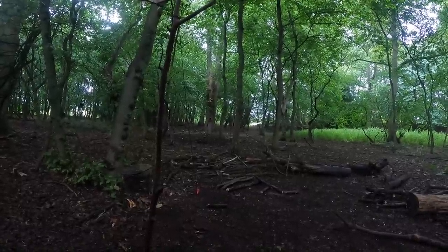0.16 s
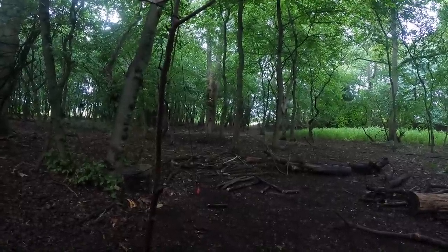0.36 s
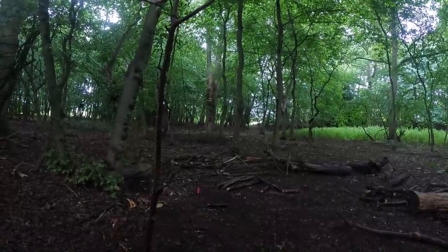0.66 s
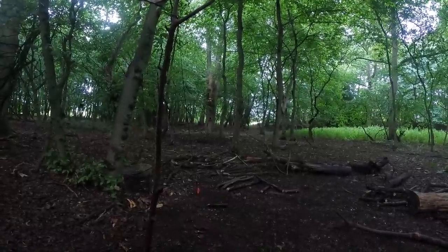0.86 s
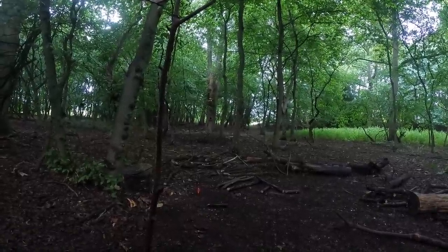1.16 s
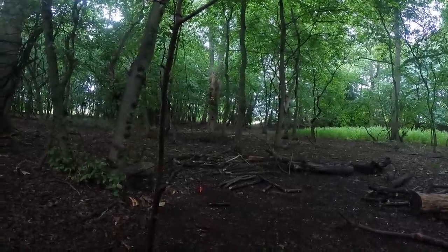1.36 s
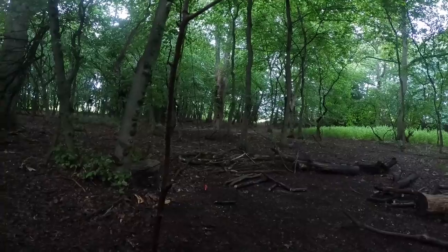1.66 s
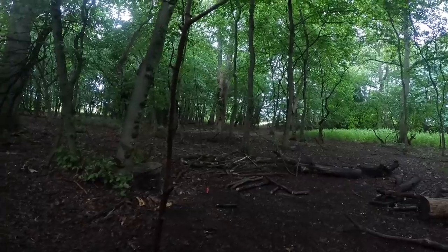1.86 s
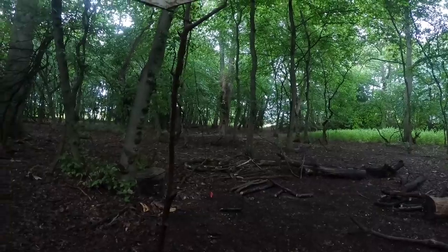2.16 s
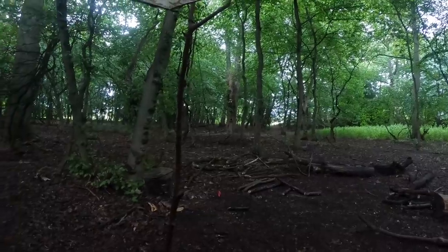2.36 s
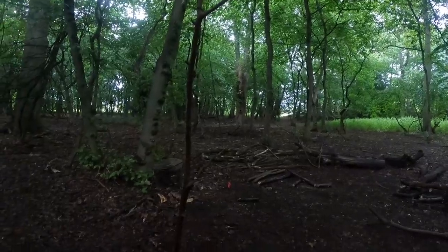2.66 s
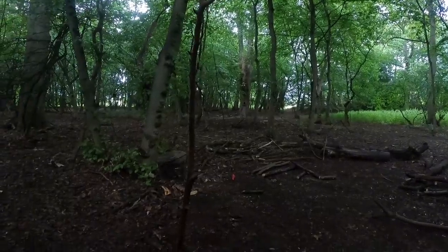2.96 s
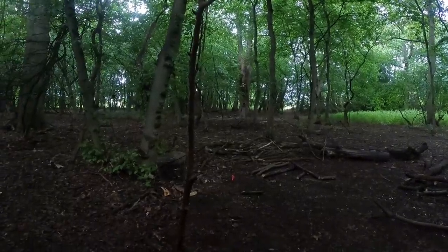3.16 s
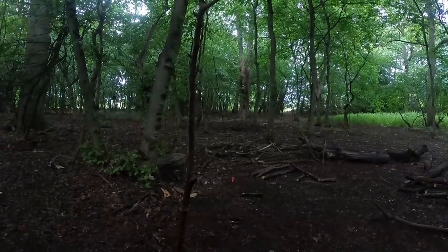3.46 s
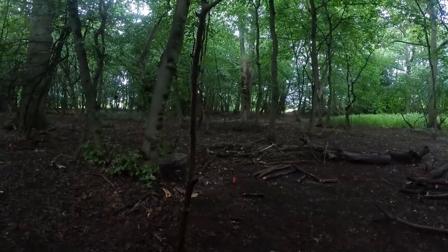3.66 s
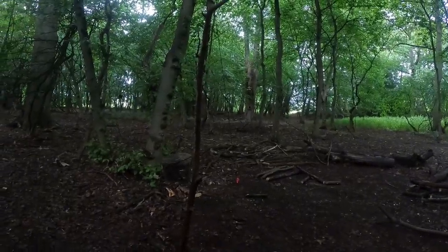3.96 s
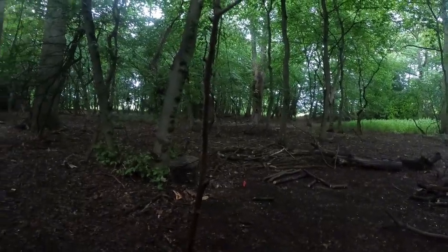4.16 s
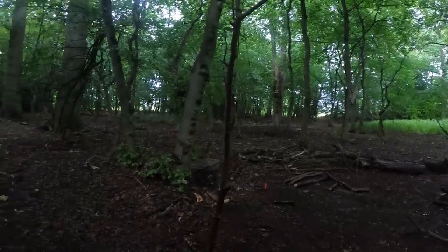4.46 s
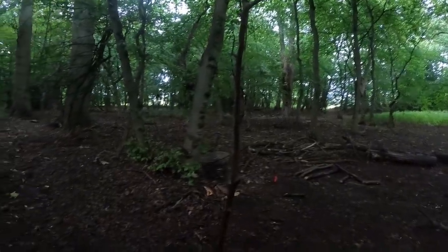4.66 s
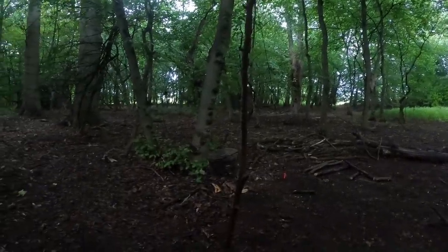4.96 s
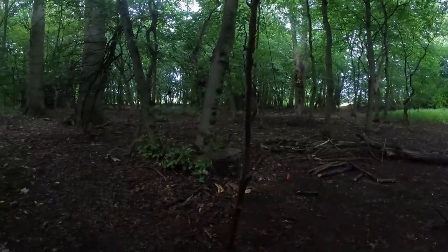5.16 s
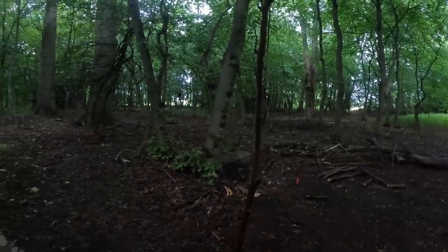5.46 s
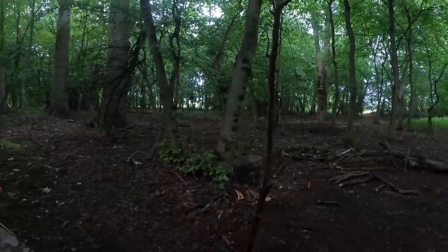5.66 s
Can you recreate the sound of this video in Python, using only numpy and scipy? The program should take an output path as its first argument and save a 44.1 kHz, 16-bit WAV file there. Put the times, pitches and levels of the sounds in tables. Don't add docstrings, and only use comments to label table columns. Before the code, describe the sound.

Heavy raindrops smack taut tent fabric close overhead while a small bird chips, whistles and trills over soft distant rain in the woods.

```python
import sys
import numpy as np
from scipy import signal
from scipy.fft import rfft, irfft
from scipy.io import wavfile
from scipy.ndimage import uniform_filter1d

SR = 44100
rng = np.random.default_rng(int(sys.argv[2]) if len(sys.argv) > 2 else 0)


def field_ratio(decibels):
    return 10 ** (np.asarray(decibels, dtype=float) / 20)


def store_wav(level_fs):
    pcm = np.round(np.clip(np.atleast_2d(level_fs), -1, 1) * 32767)
    wavfile.write(sys.argv[1], SR, pcm.T.astype(np.int16))


N = 257103

# f/Hz, level per Hz/dB
SPRAY = [(300, 2), (1000, 4), (3500, 0.5), (7000, -4.5), (12000, -20.5), (16000, -25)]


def rms_one(x):
    return x / np.sqrt(np.mean(x ** 2) + 1e-20)


def coloured(spectrum, size):
    hz = np.maximum(np.arange(size // 2 + 1) * SR / size, 1)
    points = np.array(spectrum)
    gain = field_ratio(np.interp(np.log(hz), np.log(points[:, 0]), points[:, 1], left=-80, right=-80))
    return rms_one(irfft(rfft(rng.standard_normal(size)) * gain, size))


def curve(rows):
    s, db = np.transpose(rows)
    return field_ratio(np.interp(np.arange(N) / SR, s, db, left=-150, right=-150))


def resonate(x, hz, width_hz):
    r = np.exp(-np.pi * width_hz / SR)
    zeros = np.array([1, 0, -1]) * (1 - r * r) / 2
    poles = [1, -2 * r * np.cos(2 * np.pi * hz / SR), r * r]
    return signal.lfilter(zeros, poles, x)


def add(track, s, sound):
    i = round(s * SR)
    track[i:i + len(sound)] += sound[:N - i]


def heavy_drops():
    # t/s, peak level/dB, last wave f/Hz, flutter f/Hz, slackness/dB (more wave, less flutter)
    overhead = [
        (.2559, -5.5, 130, 3620, -2.5),
        (.8715, -7.5, 150, 3470, 2.5),
        (1.563, -6, 153, 1910, 0),
        (2.5535, -3, 260, 1200, 2.5),
        (2.9918, -9.5, 150, 4070, -5),
        (3.3944, -6.5, 151, 2320, -2.5),
    ]
    out, t = np.zeros(N), np.arange(4096) / SR
    late = np.maximum(t - .0006, 0)
    after = late > 0
    for s, db, wave_hz, flutter_hz, slack_db in overhead:
        wave_db, flutter_db = -8.5 + slack_db, -11 - slack_db
        spike = 1.47 * np.exp(-((t - .0005) / .000045) ** 2)
        spike = spike - 0.25 * np.exp(-((t - .00068) / .0001) ** 2)
        pitch = wave_hz + 750 * np.exp(-late / .0013)
        ringing = np.exp(-late / .0025) + .17 * np.exp(-late / .0075)
        wave = -np.sin(2 * np.pi * np.cumsum(pitch * after) / SR) * ringing
        burst = np.exp(-(late / .0015) ** 2) + .2 * np.exp(-late / .007) + .01 * np.exp(-late / .05)
        burst = after * burst + .15 * np.exp(-((late - .006) / .0015) ** 2)
        flutter = burst * rms_one(resonate(rng.standard_normal(4096), flutter_hz, 530))
        spray = burst * coloured(SPRAY, size=4096)
        dull = signal.lfilter([.45], [1, -.55], spray)
        spray = 1.5 * np.exp(-late / .0005) * spray + dull
        drop = spike + field_ratio(wave_db) * wave + field_ratio(flutter_db) * flutter + field_ratio(-16.5) * spray
        add(out, s, field_ratio(db - 5.0) * drop)
    return out


def light_drops():
    # t/s, peak level/dB, tap f/Hz, spray over the tap level/dB
    near_taps = [(0.117, -49.5, 1080, -0.5), (1.004, -44.5, 696, -2.5), (1.0865, -28, 990, -6.5),
                 (1.248, -34, 1220, -3.5), (1.411, -44.5, 1000, 2.5), (1.991, -61, 1610, 13),
                 (2.316, -49, 1730, 0.5), (2.679, -57.5, 676, 3.5), (2.893, -41.5, 840, -5),
                 (3.217, -33.5, 1060, -9.5), (3.262, -36.5, 785, -6.5), (3.296, -47, 2000, 4.5),
                 (3.425, -48, 1210, 0), (4.29, -48, 1970, -1.5), (4.401, -42, 740, -11)]
    # t/s, peak level/dB, tap f/Hz
    far_taps = [(0.229, -55, 665), (0.32, -48, 1420), (0.41, -40, 2110), (0.429, -38, 2300),
                (0.46, -46, 2350), (0.741, -50, 2080), (1.113, -53, 799), (1.162, -48.5, 1030),
                (1.278, -48, 1820), (1.482, -67, 1100), (1.688, -38, 2450), (1.733, -48, 1190),
                (1.814, -45, 1430), (1.924, -42.5, 670), (2.066, -42, 2480), (2.265, -55, 1870),
                (2.517, -58, 770), (2.609, -43, 2270), (2.714, -42, 1930), (3.636, -52, 670),
                (3.723, -40, 1730), (3.944, -64, 1220), (3.993, -62, 1020), (4.076, -42.5, 1180),
                (4.831, -46.5, 1900), (5.116, -43, 2100), (5.228, -52, 1110), (5.406, -52, 754),
                (5.527, -63, 1410), (5.777, -46.5, 2560)]
    far_spray_db = -56
    out, t = np.zeros(N), np.arange(2048) / SR
    for s, db, tap_hz, spray_db in near_taps + [(s, db, hz, far_spray_db - db) for s, db, hz in far_taps]:
        spray = coloured(SPRAY, size=2048) * (np.exp(-t / 0.001) + 0.3 * np.exp(-t / 0.007))
        tap = np.sin(2 * np.pi * tap_hz * t) * np.exp(-t * tap_hz / .9)
        add(out, s + .0008, field_ratio(db + 2.5) * (tap + field_ratio(spray_db) * spray))
    return out


def whistle(pitch, db, soft=.6):
    swell = np.sin(np.pi * np.linspace(0, 1, len(pitch)) ** .82) ** 2
    return field_ratio(db) * np.sqrt(2) * swell ** (soft / 2) * np.sin(2 * np.pi * np.cumsum(pitch) / SR)


def slurs_and_chips():
    # t/s, length/s, from f/Hz, to f/Hz, level/dB
    slur_rows = [
        (1.197, 0.033, 4350, 4760, -57.5),
        (1.31, 0.031, 4240, 4880, -52.5),
        (1.533, 0.022, 3460, 4540, -63),
        (3.174, 0.0465, 3480, 3680, -48),
        (3.365, 0.023, 3240, 3430, -63),
        (3.642, 0.029, 4180, 5400, -45),
        (3.776, 0.22, 4110, 4090, -59.5),
        (5.201, 0.079, 6450, 6850, -46.5),
        (5.256, 0.075, 6920, 6880, -54),
    ]
    notes = [(*row, .75) for row in slur_rows]
    first_s, period_s, length_s, from_hz, to_hz = 1.6, .0893, .026, 5840, 4000
    for k in range(7):
        notes.append((first_s + k * period_s, length_s, from_hz, to_hz, -48.5 + k * 0.62, .87))
    return notes


def vees():
    # t/s, from f/Hz, level/dB, rise after/s, rise from f/Hz
    vee_rows = [
        (2.4, 5340, -48.5, 0.03, 3450),
        (2.616, 5480, -47, 0.047, 3570),
        (5.625, 6030, -45, 0.039, 3940),
    ]
    low_hz, fall_hz_per_s = 4090, 68000
    notes = []
    for s, from_hz, db, after, rise_hz in vee_rows:
        notes += [(s, (from_hz - low_hz) / fall_hz_per_s, from_hz, low_hz, db, 1),
                  (s + after, 0.0135, rise_hz, rise_hz * 1.26, db - 3.5, 1)]
    return notes


def settling_whistles():
    # t/s, length/s, from f/Hz, to f/Hz, level/dB
    trailing = [
        (2.995, 0.077, 5270, 4890, -40),
        (3.878, 0.11, 7670, 6970, -44.5),
        (4.133, 0.066, 5390, 4864, -39.5),
    ]
    # t/s, length/s, level/dB, drop after/s, drop level/dB
    hook_rows = [
        (3.535, 0.039, -43.5, 0.04, -47.5),
        (3.697, 0.086, -48.5, .059, -47),
    ]
    notes = []
    for s, length, from_hz, to_hz, db in trailing:
        bend = (length / .055) ** 3
        notes += [(s, length, from_hz, to_hz, db, bend),
                  (s + length, length, to_hz, to_hz * 0.97, db - 8.5, 1)]
    for s, length, db, after, drop_db in hook_rows:
        notes += [(s, length, 4330, 4085, db, 2.47),
                  (s + after, .033, 4200, 3250, drop_db, .7)]
    return notes


def glides():
    out = np.zeros(N)
    for s, length, from_hz, to_hz, db, bend in slurs_and_chips() + vees() + settling_whistles():
        u = np.linspace(1, 0, round(length * SR))
        add(out, s, whistle(to_hz + (from_hz - to_hz) * u ** bend, db, soft=0.65))
    return out


def arches():
    # t/s, length/s, from f/Hz, top f/Hz, level/dB
    arch_rows = [
        (2.229, 0.13, 6900, 7530, -47.5),
        (2.456, 0.11, 6990, 7370, -47),
        (2.674, 0.13, 6970, 7486, -50),
        (3.268, 0.047, 6100, 7120, -45.5),
        (3.422, 0.05, 4640, 5990, -41),
        (5.44, 0.15, 7500, 8160, -55.5),
        (5.679, 0.13, 6860, 8100, -54),
    ]
    out = np.zeros(N)
    for s, length, from_hz, top_hz, db in arch_rows:
        u = np.linspace(0, 1, round(length * SR))
        rise = (top_hz - from_hz) * np.exp(-u * length / .006)
        fall = 1200 * (.2 * u + .8 * u ** (37 * length))
        add(out, s, whistle(top_hz - rise - fall, db, soft=.7))
    return out


def trill():
    trill_beat = (4.4065, .02895, .002, .008, 6200, 4250)
    first, period, late, length, from_hz, to_hz = trill_beat
    size = round(length * SR)
    note = whistle(np.linspace(from_hz, to_hz, size), -51, soft=1.5)
    grace = whistle(np.linspace(6550, 6250, size), -61, soft=1.5)
    out = np.zeros(N)
    for k in range(27):
        add(out, first + k * period + late * (k % 2), note * field_ratio(rng.normal(0, 1.2)))
        add(out, first + k * period + period / 2, grace)
    return out


def soft_swell():
    # f/Hz, level per Hz/dB
    swell_colour = [(180, -43), (300, -21), (417, -14), (500, -20), (892, -5.5), (3450, -7.5), (3940, -12.5),
                    (4960, 0), (15500, -23.5)]
    # f/Hz, width/Hz, level/dB
    bands = [(3480, 430, 7.5), (9050, 300, -8), (10800, 400, -3)]
    grain = uniform_filter1d(rng.standard_normal(N), size=150)
    grains = coloured(swell_colour, size=N) * field_ratio(0.92 * rms_one(grain))
    grains = grains + sum(field_ratio(db) * resonate(grains, hz, width) for hz, width, db in bands)
    attack_s, hold_s, release_s, fade_s = .035, .225, .02, .075
    s = 4.145 + np.cumsum([0, attack_s, hold_s, release_s, fade_s])
    stroke = np.transpose([s, -68 + np.array([-14, 0, 0, -9, -14])])
    patches = field_ratio(2.0 * rms_one(uniform_filter1d(rng.standard_normal(N), size=1200)))
    return field_ratio(14.5) * patches * curve(stroke) * rms_one(grains)


def far_bird():
    # t/s, length/s, from f/Hz, to f/Hz, level/dB
    distant = [
        (0.54, 0.135, 2840, 2605, -65),
        (1.03, 0.05, 5640, 5760, -61),
        (1.32, 0.07, 2780, 2600, -62),
        (2.852, 0.04, 3200, 2860, -58),
    ]
    out = np.zeros(N)
    for s, length, from_hz, to_hz, db in distant:
        add(out, s, whistle(np.linspace(from_hz, to_hz, round(length * SR)), db))
    return out


def woods(x):
    t = np.arange(SR) / SR
    twigs = rms_one(np.exp(-t / .006) * (t > .001)) * field_ratio(-7)
    early = rms_one(np.exp(-t / .04) * (t > .006)) * field_ratio(-6.5)
    t60_s = 1.1
    tail = rms_one(field_ratio(-60 * t / t60_s) * (1 - np.exp(-t / 0.037))) * field_ratio(-8)
    response = (twigs + early + tail) * rng.standard_normal(SR) / np.sqrt(SR)
    return signal.fftconvolve(x, response)[:N]


def far_rain():
    # f/Hz, level per Hz/dB
    rain_colour = [(12, -40), (20, -2.5), (114, 0), (184, -2.5), (297, -10), (566, -15), (750, -13),
                   (1560, -16.5), (4930, -15), (6710, -20.5), (8650, -26), (15200, -36), (16500, -47.5)]
    # t/s, level/dB
    rain_level = [(0.0, -61), (0.24, -61), (1.51, -61), (2.82, -59.5), (3.68, -62), (4.34, -59.5),
                  (4.55, -61.5), (5.18, -61), (5.83, -61)]
    hits = rng.random(N) < 120 / SR
    sizes = field_ratio(6.2 * np.minimum(rng.exponential(1, N), 4))
    marks = hits * sizes * rng.choice([-1, 1], N)
    patter = rms_one(resonate(resonate(marks + 1e-18, 2000, 2200), 2000, 2200))
    level = field_ratio(np.interp(np.arange(N) / SR, *np.transpose(rain_level)))
    return level * (field_ratio(2.0) * coloured(rain_colour, size=N) + field_ratio(-12.5) * patter)


def port_noise():
    # f/Hz, level per Hz/dB
    port_colour = [(12, -27), (20, 13), (138, -29), (472, -22), (949, -35), (10500, -41), (13900, -25.5),
                   (16000, -50)]
    return field_ratio(-72.5) * coloured(port_colour, size=N)


def scene():
    song = field_ratio(-4) * (glides() + arches() + trill())
    drops = heavy_drops() + light_drops()
    ringing = woods(song + far_bird() + field_ratio(-26) * drops)
    mid = song + ringing + drops + soft_swell() + far_rain()
    side = port_noise() + field_ratio(-37) * np.roll(drops, 9)
    return np.array([mid + side, mid - side])


def band_limit(x):
    return signal.sosfilt(signal.butter(12, 17030, fs=SR, output="sos"), x)


def record(dry):
    dry = signal.sosfilt(signal.butter(2, 48, "high", fs=SR, output="sos"), dry)
    dry = signal.sosfilt(signal.cheby2(10, 50, 16900, fs=SR, output="sos"), dry)
    return band_limit(dry)


dry = scene()
out = record(dry)
store_wav(out)
```